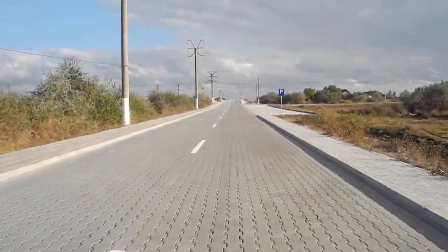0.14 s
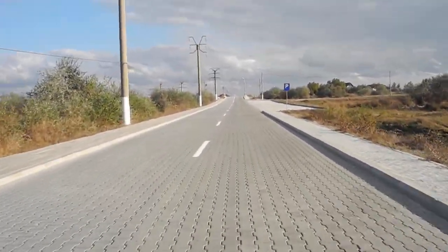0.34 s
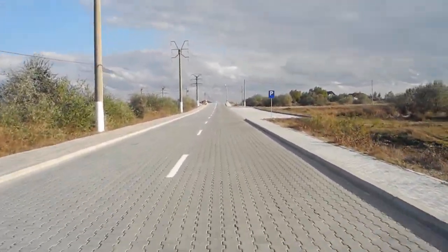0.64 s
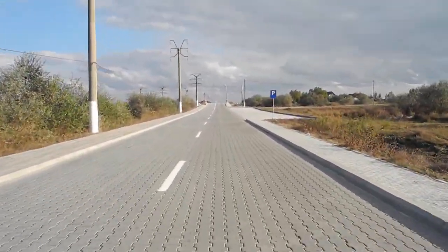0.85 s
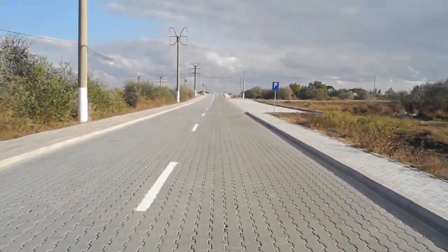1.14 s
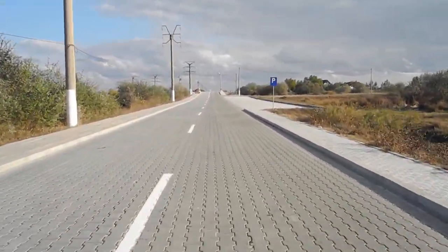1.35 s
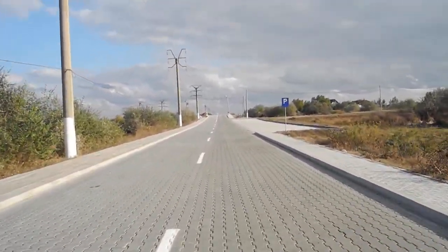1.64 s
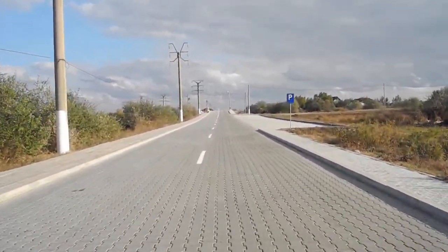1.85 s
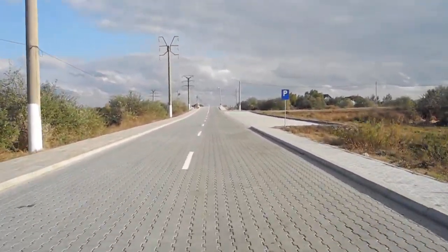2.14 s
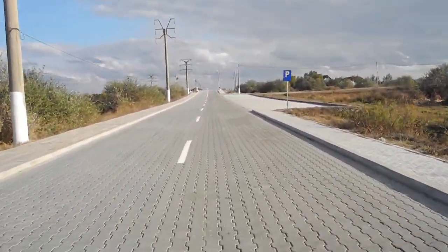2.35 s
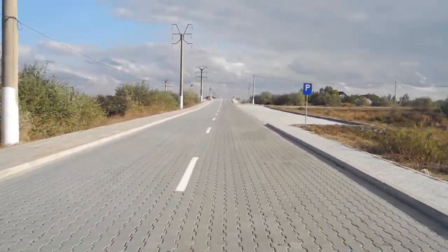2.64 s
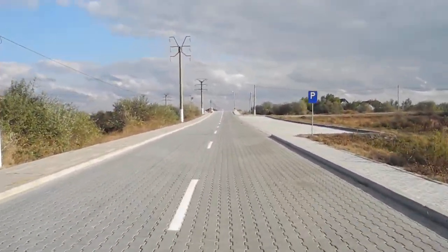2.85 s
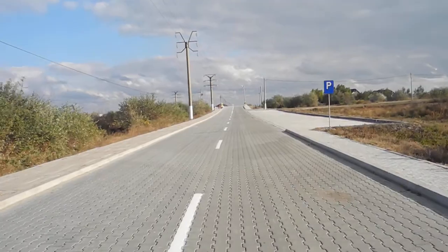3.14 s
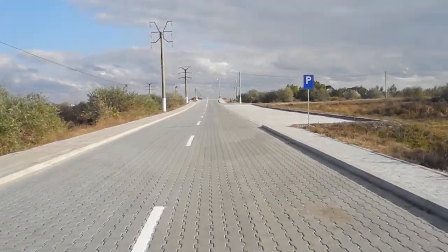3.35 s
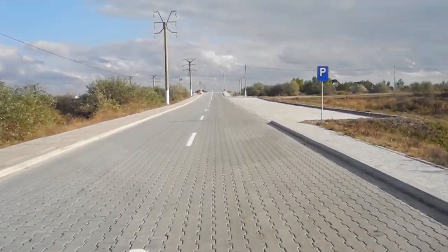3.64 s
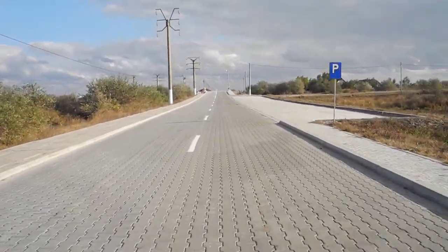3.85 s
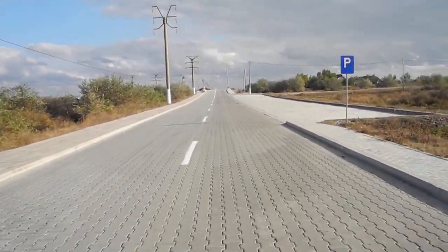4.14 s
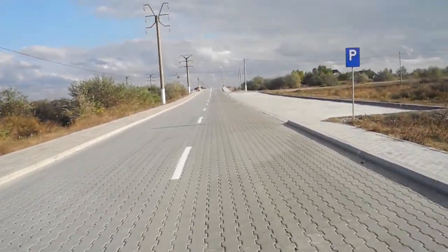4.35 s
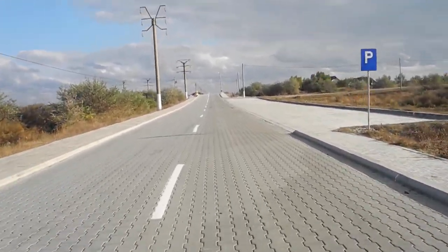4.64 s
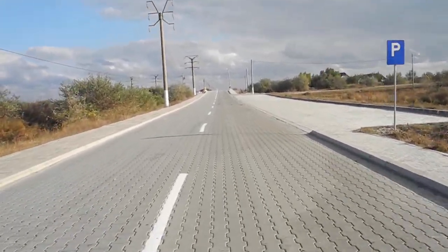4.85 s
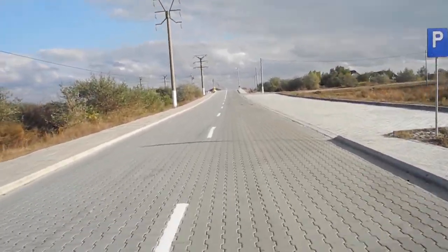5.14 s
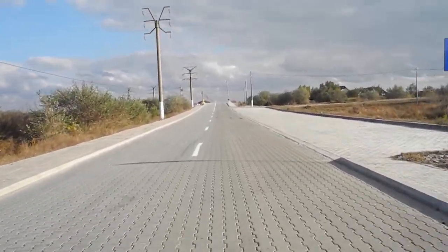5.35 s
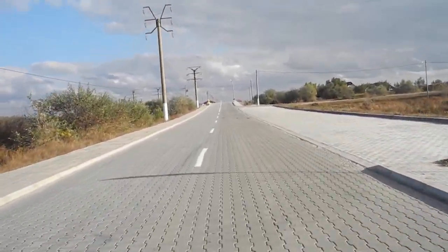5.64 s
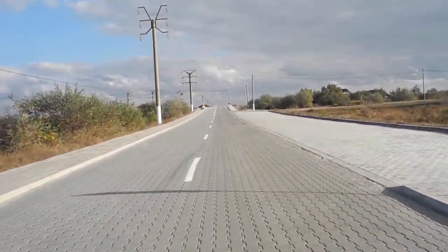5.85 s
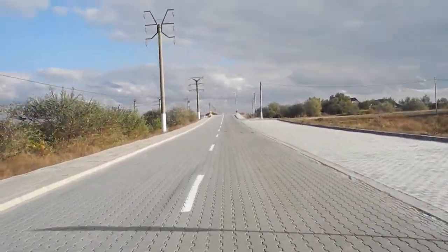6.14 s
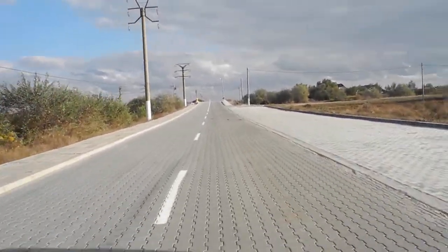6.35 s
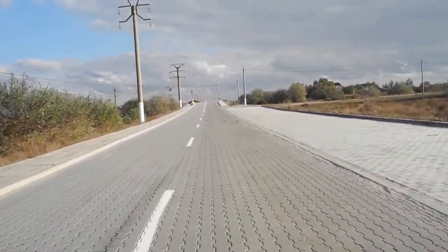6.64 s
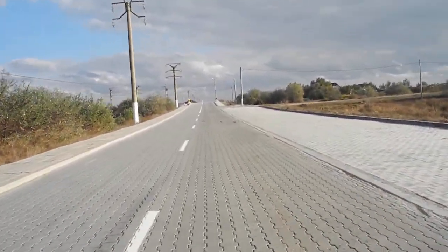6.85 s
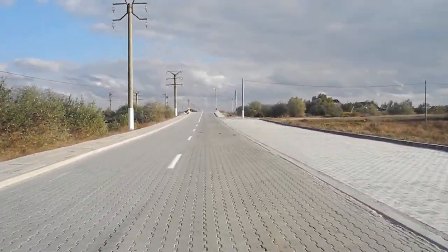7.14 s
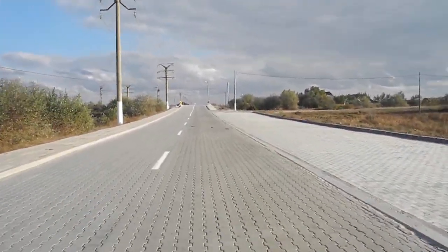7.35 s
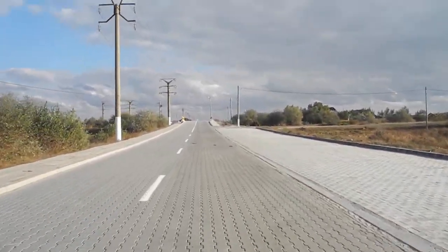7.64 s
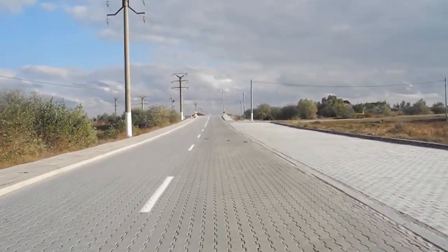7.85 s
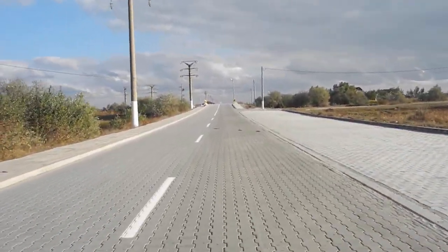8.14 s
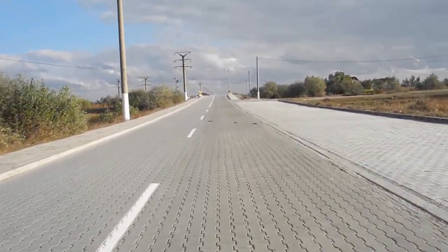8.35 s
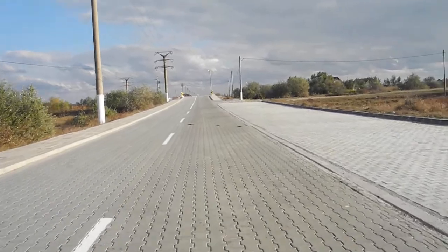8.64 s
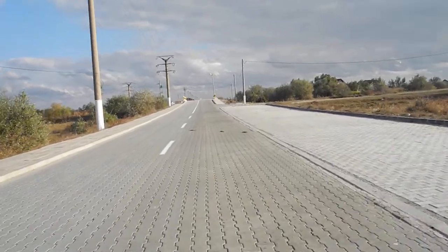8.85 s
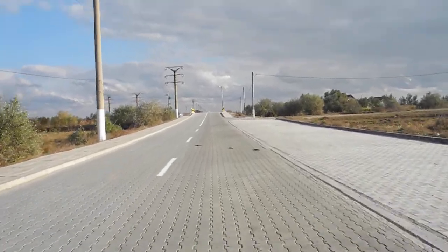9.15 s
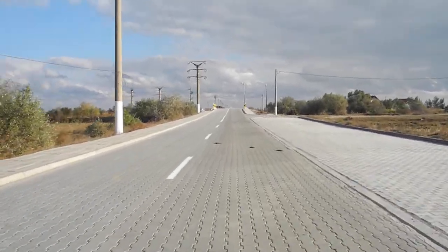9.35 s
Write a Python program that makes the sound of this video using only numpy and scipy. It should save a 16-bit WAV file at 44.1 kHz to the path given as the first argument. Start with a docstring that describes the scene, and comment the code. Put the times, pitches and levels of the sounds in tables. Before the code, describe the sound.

Wind buffets a microphone riding on a bicycle outdoors, a deep, uneven rumble with rushing air, hiss and crackle. Underneath, the tyres rumble steadily over paving stones, and loose parts give small, high rattles and clinks. Gusts and rattles come thickly in the first four seconds, thin out briefly, then return. Sharp pops, a few knock-like slaps of air and brief hollow hoots hit the microphone along the way.

```python
"""Cycling into the wind

A camera rides on a bicycle. The tyres rumble over paving stones and loose parts rattle and clink.
Air buffets the microphone ports, rushes over the case and hoots in single eddies; the ports hiss,
crackle and now and then take a slap. Gusts, shoves and brief lulls ride on a slowly changing headwind."""
import sys
import numpy as np
from scipy import signal
from scipy.fft import rfft, irfft
from scipy.io import wavfile
from scipy.ndimage import uniform_filter1d, map_coordinates

SR = 44100
rng = np.random.default_rng(int(sys.argv[2]) if len(sys.argv) > 2 else 0)


def put_to_file(sound):
    """Save the sound as 16-bit audio at rate SR, in the file named by the first command-line argument."""
    columns = np.atleast_2d(sound).T  # one column per channel
    safe = np.clip(columns, -1, 1)
    whole_steps = np.round(safe * 32767)
    wavfile.write(sys.argv[1], SR, whole_steps.astype(np.int16))


N = 418509
TIME = np.arange(N) / SR
USUAL_HISS_DB = -70.5


def undb(db):
    """Decibels to gain."""
    return 10 ** (np.asarray(db) / 20)


def unit(x):
    """Scale to rms 1."""
    return x / np.sqrt(np.mean(x ** 2))


def wander(rate_hz):
    """Smooth random wander of rms 1."""
    steps = rng.standard_normal(N // 20)
    return unit(map_coordinates(steps, [TIME * rate_hz], order=2, mode="mirror"))


def colour(x, outline, size=4096):
    """Minimum-phase filter of unit energy, shaped by (Hz, dB) points."""
    hz, db = np.transpose(outline)
    bin_hz = np.maximum(np.arange(size // 2 + 1) * SR / size, 1)
    gain = undb(np.interp(np.log(bin_hz), np.log(hz), db))
    cepstrum = irfft(np.log(gain))
    cepstrum[1:size // 2] *= 2
    cepstrum[size // 2 + 1:] = 0
    response = irfft(np.exp(rfft(cepstrum)))
    return signal.oaconvolve(np.atleast_2d(x), [response / np.linalg.norm(response)], axes=1)[:, :N]


def zero_phase(x, order, hz, kind="low"):
    """Flat-passband filter, run forwards and backwards."""
    return signal.sosfiltfilt(signal.butter(order, hz, kind, fs=SR, output="sos"), x)


def resonate(x, hz, *widths_hz):
    """Resonances in series, one per width, with gain 1 at the centre."""
    for width_hz in widths_hz:
        x = signal.lfilter(*signal.iirpeak(hz, hz / width_hz, fs=SR), x)
    return x


def add(out, start_s, sound):
    """Mix a short sound in."""
    start = max(int(start_s * SR), 0)
    part = sound[..., :N - start]
    out[..., start:start + part.shape[-1]] += part


def specks(per_s, spread_db):
    """Sparse impulses, independent left and right; most are small, a few large."""
    hit = rng.random((2, N)) < per_s / SR
    sign = rng.choice([-1, 1], (2, N))
    return hit * sign * undb(spread_db * (rng.random((2, N)) ** 2 - 3.0))


def swells(rows):
    """Bell curves summed in dB. Each row: centre in seconds, half-height width in seconds, height in dB."""
    t = TIME[::100]
    bells = sum(db * .5 ** ((2 * (t - centre_s) / width_s) ** 2) for centre_s, width_s, db in rows)
    return np.interp(TIME, t, bells)


# Each row: resonance in Hz, width in Hz, gain in dB.
PART_MODES = [(4294, 75, 8.5), (4560, 290, 5), (5620, 580, -0.5), (6220, 410, 2.5)]


def loose_parts(knock, detune=1):
    """The bike's loose parts answer a knock with short, high resonances."""
    return sum(undb(db) * resonate(knock, hz * detune, width_hz) for hz, width_hz, db in PART_MODES)


# Each row: frequency in Hz, relative level in dB.
TYRE_SPECTRUM = [(40, -8.5), (120, 6), (270, 0.5), (330, 2), (520, -15.5), (820, -2), (1050, -21),
                 (1700, -23.5), (2300, -40.5), (6500, -50), (15000, -84)]


def tyres(hiss_db, roll_db=-47, joint_hz=37, bump_depth=0.84, decay_cycles=0.082, jiggle_gain_db=56):
    """The tread bumps at every paving joint; loose parts jiggle more when the ride is rough and windy."""
    joint_phase = np.cumsum(joint_hz * (1 + 0.05 * wander(8.7))) / SR % 1
    load = unit(1 + bump_depth * undb(8.4 * wander(40)) * np.exp(-joint_phase / decay_cycles))
    roll = colour(rng.standard_normal(N) * load, TYRE_SPECTRUM)
    shake_db = np.minimum(hiss_db, np.median(hiss_db) + 13)
    jiggles_per_s = 16 * load ** 2 * undb(0.52 * (shake_db - USUAL_HISS_DB))
    jiggle = loose_parts(specks(jiggles_per_s, spread_db=10))
    return roll * undb(roll_db) + jiggle * undb(jiggle_gain_db + shake_db)


# Each row: time in seconds, level before trim in dB, tick relative to ring in dB.
RATTLE_HITS = [(0.283, -51.5, -20), (0.709, -49, -18), (0.923, -52, -22), (1.256, -48, -18),
               (1.313, -41, -10), (1.455, -49, -17), (1.585, -40, 4.5), (1.68, -52, -20), (2.071, -50, -12),
               (2.144, -52, -16), (2.674, -42, -16), (2.772, -52, -15), (2.953, -47.5, -4),
               (3.052, -51, -7), (3.216, -50.5, -13), (3.397, -46, -20), (3.446, -44, -7), (3.599, -45, -4),
               (3.764, -46, -6), (4.019, -45, -7), (6.182, -54.5, -16), (6.474, -49, -17), (6.565, -52, -6),
               (6.661, -47, -7), (6.802, -57, -11), (7.029, -55, -3), (7.279, -51, 1), (7.834, -45.5, -8),
               (8.015, -46, -20.5), (8.124, -46.5, -20.5), (8.212, -55.5, -26), (8.672, -46.5, -21),
               (9.046, -46, -21), (9.17, -46.5, -28)]


def rattles(rise_s=0.00041, decay_s=0.0009, touches=4, chatter_db=-11, chatter_s=0.0095,
            tick_hz=10500, tick_width_hz=4500, trim_db=-14, size=4096):
    """A brief knock amid a cluster of lighter touches; harder contact adds a bright tick."""
    out, t = np.zeros((2, N)), (np.arange(size) - size // 2) / SR

    def touch(lag_s):
        return np.exp(np.minimum((t - lag_s) / rise_s, (lag_s - t) / decay_s))

    for time_s, db, tick_db in RATTLE_HITS:
        chatter = sum(rng.random() * touch(lag_s) for lag_s in chatter_s * rng.standard_normal(touches))
        knock = rng.standard_normal((2, size)) * (touch(0) + undb(chatter_db) * chatter)
        tick = unit(resonate(knock, tick_hz, tick_width_hz, 2 * tick_width_hz))
        detune = np.exp(0.04 * rng.standard_normal())  # each contact holds the parts differently
        ring = unit(loose_parts(knock, detune))
        add(out, time_s + t[0], unit(ring + undb(tick_db) * tick) * undb(db + trim_db))
    return out


# Each row: start in seconds, level before trim in dB, pitch in Hz.
SHORT_NOTES = [(2.206, -42, 1700), (2.673, -54, 4040), (3.445, -55, 2080), (3.569, -44, 2300),
               (6.581, -55, 1930), (6.658, -50.5, 2300), (6.694, -52, 1880), (6.768, -51, 1900),
               (7.277, -47.5, 1940), (7.589, -51, 2720)]


def short_notes(rise_s=0.00031, decay_s=0.013, width_hz=420, trim_db=-6, size=2048):
    """Short pitched notes: clinks, and the midrange ring of two wind pops (2.206 s and 7.589 s)."""
    out, t = np.zeros(N), np.arange(size) / SR
    for start_s, db, hz in SHORT_NOTES:
        burst = rng.standard_normal(size) * (1 - np.exp(-t / rise_s)) * np.exp(-t / decay_s)
        note = unit(resonate(burst, hz, width_hz, width_hz))
        add(out, start_s, note * undb(db + trim_db))
    return out


# Each row: time in seconds, wind strength in dB.
HEADWIND = [(0, -60.5), (0.6, -55), (1.2, -50.5), (1.85, -50.5), (2.55, -52), (3.11, -50), (3.3, -55),
            (3.88, -51.5), (4.2, -57.5), (4.7, -55), (5.81, -50), (6.51, -55.5), (7.15, -57.5),
            (8.07, -54.5), (8.47, -55), (8.65, -46), (8.95, -48.5), (9.3, -46.5), (9.49, -60)]
# Each row: centre in seconds, width in seconds, rush rise in dB, hiss rise in dB.
WIND_GUSTS = [(0.32, 0.2, 3, 2.5), (0.711, 0.037, 6.5, 11), (1.05, 0.35, 1.5, 2), (1.26, 0.032, 7, 7),
              (1.314, 0.045, 12, 17), (1.58, 0.16, 6, 6.5), (2.209, 0.1, 5, 8.5), (2.59, 0.16, 6.5, 5),
              (2.642, 0.041, 6.5, 12), (2.77, 0.14, 5, 8.5), (3.055, 0.075, 7.5, 5), (3.56, 0.13, 6.5, 11),
              (3.78, 0.12, 9, 10), (5.535, 0.073, 8, 1), (6.66, 0.22, 3, 7.5), (6.77, 0.072, 7, 7.5),
              (7.28, 0.023, 8, 14), (7.62, 0.084, 5.5, 4), (7.819, 0.058, 8.5, 9), (8.7, 0.038, 5.5, 0.5),
              (8.84, 0.04, 8, 7), (9.06, 0.087, 3, 3), (9.326, 0.051, 6, 4)]
# Each row: centre in seconds, width in seconds, buffet change in dB, rush change in dB (capped at 0).
WIND_LULLS = [(0.2, 0.043, -18, -4.5), (0.552, 0.054, -11.5, -5), (0.859, 0.072, -5, -0.5),
              (1.46, 0.053, -12.5, -2.5), (1.68, 0.032, -11, 0), (2.41, 0.03, -5, -11),
              (2.47, 0.068, -18, 9), (2.87, 0.061, -3, -5.5), (3.45, 0.12, -5.5, -2),
              (3.72, 0.1, -8.5, -1.5), (4.242, 0.041, -4, -10), (4.329, 0.033, -11, -5),
              (4.729, 0.089, -4.5, -4), (5.38, 0.12, -5, -4), (5.77, 0.03, -16, 0),
              (6.405, 0.043, -13, -14), (6.669, 0.079, -10, 0.5), (7.21, 0.066, -6.5, -3.5),
              (7.47, 0.08, -12, -4), (8.259, 0.04, -14, -6), (8.55, 0.14, -11, -3), (9.249, 0.15, -6, 0)]
# Each row: centre in seconds, width in seconds, buffet rise in dB.
WIND_SHOVES = [(0.46, 0.073, 4.5), (0.97, 0.027, 4), (1.61, 0.04, 6.5), (1.85, 0.068, 4), (2.2, 0.025, 3.5),
               (2.64, 0.05, 4), (2.815, 0.035, 6), (5.17, 0.027, 5.5), (5.62, 0.0605, 6.5),
               (5.82, 0.041, 9.5), (6.5, 0.045, 7.5), (7.27, 0.04, 4.5), (8.16, 0.058, 5)]


def airflow(usual_wind_db=-53, usual_buffet_db=-33.5, unrest_hz=14, unrest_db=1.19, sputter_db=1.76):
    """Drive levels in dB: headwind and gusts lift rush and hiss, shoves lift the buffet, lulls dip them."""
    wind = np.interp(TIME, *np.transpose(HEADWIND)) - usual_wind_db
    unrest = unrest_db * wander(unrest_hz)
    sputter = sputter_db * wander(unrest_hz)
    rush_gust = swells((s, width_s, db) for s, width_s, db, _ in WIND_GUSTS)
    hiss_gust = swells((s, width_s, db) for s, width_s, _, db in WIND_GUSTS)
    buffet_lull = swells((s, width_s, db) for s, width_s, db, _ in WIND_LULLS)
    rush_lull = swells((s, width_s, min(db, 0)) for s, width_s, _, db in WIND_LULLS)
    buffet_db = usual_buffet_db + swells(WIND_SHOVES) + buffet_lull
    rush_db = usual_wind_db + wind + unrest + rush_gust + rush_lull
    hiss_db = USUAL_HISS_DB + 0.98 * wind + unrest + hiss_gust + 1.43 * rush_lull + sputter
    return buffet_db, rush_db, hiss_db


# Each row: frequency in Hz, relative level in dB.
HISS_SPECTRUM = [(1500, -33), (3000, 3.5), (3600, -3.5), (4200, 0), (5200, -1), (6500, -1), (8000, -5.5),
                 (11000, -10.5), (16000, -17)]


def hissing(hiss_db, air_gain_db=1.1, flicker_db=3, crackle_gain_db=43, clump_db=6, sheen_hz=8000):
    """Fine turbulence hisses and crackles in clumps at each port; slack air is duller and crackles less."""
    excess_db = hiss_db - USUAL_HISS_DB
    air = rng.standard_normal((2, N)) * undb(air_gain_db + flicker_db * wander(64))
    crackles_per_s = 60 * undb(excess_db + clump_db * wander(30))
    crackle = specks(crackles_per_s, spread_db=12.5) * undb(crackle_gain_db)
    hiss = colour((air + crackle) * undb(hiss_db), HISS_SPECTRUM)
    dull = zero_phase(hiss, 3, sheen_hz)
    sheen_db = np.minimum(1.4 * excess_db - 3.5, 1)
    return dull + (hiss - dull) * undb(sheen_db)


# Each row: frequency in Hz, relative level in dB.
POP_SPECTRUM = [(500, 5), (2500, -8), (3300, 0.5), (4300, 1.5), (6500, 0.5), (9000, -4), (13000, -9),
                (16000, -19)]
# Each row: time in seconds, level before trim and filter in dB, port (0 left, 1 right).
LOUD_POPS = [(0.06, -25.5, 0), (1.352, -28, 1), (1.725, -35, 1), (1.804, -30, 1), (1.831, -28, 1),
             (2.253, -25.5, 1), (2.272, -28, 1), (2.295, -26, 1), (3.925, -29.5, 0), (4.208, -26.5, 0),
             (4.401, -28.5, 0), (4.466, -27.5, 0), (4.895, -29, 1), (4.932, -27, 1), (5.174, -26.5, 0),
             (5.562, -27, 1), (5.651, -29.5, 1), (5.822, -27, 0), (6.126, -27.5, 1), (6.159, -28, 1),
             (6.323, -33, 1), (6.344, -30, 1), (6.745, -24, 1), (6.831, -30, 1), (6.963, -34.5, 1),
             (7.006, -29.5, 1), (7.408, -27.5, 1), (7.591, -24.5, 1), (7.682, -26, 1), (8.17, -31.5, 1),
             (8.721, -32.5, 0), (9.43, -29.5, 0)]


def pops(buffet, hiss_db, crest_over_rms=1.8, over_hiss_db=31, scatter_db=5.5, trim_db=3,
         soften_db=-30, soften_s=0.0044, size=1024):
    """Air pops at one port; a brief noise swell softens each pop's edges. Small pops ride buffet crests."""
    crests, _ = signal.find_peaks(np.abs(unit(buffet[0])), height=crest_over_rms, distance=size // 2)
    small_db = over_hiss_db + np.minimum(hiss_db, np.median(hiss_db))  # fades in the lulls
    small_pops = [(i / SR, small_db[i] + scatter_db * rng.standard_normal(), rng.random())
                  for i in crests]
    out, t = np.zeros((2, N)), (np.arange(size) - size // 2) / SR
    for time_s, db, port in list(LOUD_POPS) + small_pops:
        impulse = t == 0
        soft_edge = undb(soften_db) * rng.standard_normal(size) * np.exp(-np.abs(t) / soften_s)
        add(out[int(port > .5)], time_s + t[0], (impulse + soft_edge) * undb(db + trim_db))
    return colour(out, POP_SPECTRUM)


# Each row: time in seconds, level in dB.
AIR_SLAPS = [(2.186, -24), (2.208, -17), (5.824, -22), (6.127, -21.5), (6.158, -26), (7.368, -26),
             (7.591, -21), (7.81, -24)]


def slaps(edge_s=0.00014, settle_s=0.0023, size=1024):
    """Air pressure sags, jumps up and settles within milliseconds, sounding like a knock."""
    out, t = np.zeros(N), (np.arange(size) - size // 2) / SR
    jump = np.tanh(t / edge_s) * np.exp(-np.abs(t) / settle_s)
    for time_s, db in AIR_SLAPS:
        add(out, time_s + t[0], jump * undb(db))
    return out


# Each row: centre in seconds, level in dB, length in seconds, pitch in Hz, spit relative to hoot in dB.
PORT_EDDIES = [(0.315, -24.5, 0.0031, 430, -21), (0.679, -22, 0.019, 384, -20),
               (1.807, -25, 0.0062, 355, -29), (1.99, -23.5, 0.0068, 346, -29),
               (2.074, -22.5, 0.013, 400, -23), (2.214, -24.5, 0.012, 413, -14.5),
               (2.365, -28, 0.012, 372, -37), (2.953, -25.5, 0.018, 363, -18),
               (4.801, -22, 0.014, 390, -37), (4.834, -24.5, 0.01, 380, -36.5),
               (5.063, -31.5, 0.028, 407, -17), (5.153, -28, 0.0099, 392, -13),
               (5.309, -19.5, 0.0071, 413, -24), (5.323, -26.5, 0.008, 597, -8),
               (5.724, -23.5, 0.0053, 410, -31), (5.815, -22, 0.012, 394, -27),
               (5.865, -27, 0.014, 380, -23), (6.109, -33.5, 0.014, 544, -1), (6.125, -26, 0.013, 402, -25),
               (6.241, -25, 0.015, 392, -22), (6.296, -32, 0.019, 403, -39), (6.682, -30, 0.0064, 370, -18),
               (6.871, -28, 0.014, 373, -33), (7.341, -25.5, 0.0075, 398, -32),
               (7.367, -19, 0.0059, 383, -29), (7.588, -22, 0.0027, 390, -17),
               (7.839, -24, 0.0071, 343, -20), (7.948, -24.5, 0.026, 410, -19),
               (8.042, -23.5, 0.012, 386, -29), (8.313, -31.5, 0.032, 348, -32),
               (8.715, -19.5, 0.01, 354, -31), (8.788, -30, 0.014, 332, -23), (8.843, -32, 0.022, 344, -10)]


def eddies(hoot_width_hz=170, spit_hz=730, spit_width_hz=420, band_hz=(240, 1300), size=6144):
    """Each eddy swells and dies across the ports with a rough, hollow hoot under a breathy spit."""
    out, t = np.zeros(N), (np.arange(size) - size // 2) / SR
    for centre_s, db, length_s, hz, spit_db in PORT_EDDIES:
        air = rng.standard_normal((2, size))
        swell = np.hanning(size) / np.sqrt(1 + (2 * t / length_s) ** 2)
        hoot = resonate(air[0], hz, hoot_width_hz, hoot_width_hz)
        strength = np.sqrt(uniform_filter1d(hoot ** 2, size=400) + 1e-12)
        hoot = unit(hoot / strength)  # steady strength, wavering pitch
        spit = unit(resonate(air[1], spit_hz, spit_width_hz, spit_width_hz))
        add(out, centre_s + t[0], (hoot + undb(spit_db) * spit) * swell * undb(db))
    return zero_phase(out, 3, band_hz, "band")


# Each row: frequency in Hz, relative level in dB.
RUSH_SPECTRUM = [(150, -22.5), (290, -10), (324, 5.5), (360, -0.5), (405, -3), (470, -2.5), (540, -8.5),
                 (690, -10.5), (820, -12), (940, -17), (1120, -19.5), (1310, -15), (1520, -23),
                 (1780, -21.5), (1950, -28.5), (3100, -39.5), (5000, -70)]


def rushing(rush_db, flutter_db=2, throb_db=2, split_hz=850, body_gain_db=11, edge_gain_db=12):
    """Turbulence sounds the hollows of the case; faster air is brighter."""
    air = colour(rng.standard_normal(N) * undb(flutter_db * wander(110)), RUSH_SPECTRUM)
    body = zero_phase(air, 2, split_hz)
    edge = air - body
    mean_db = np.mean(rush_db)
    body_db = body_gain_db + mean_db + 0.87 * (rush_db - mean_db) + throb_db * wander(35)
    return body * undb(body_db) + edge * undb(rush_db + edge_gain_db)


# Each row: frequency in Hz, relative level in dB.
BUFFET_SPECTRUM = [(15, -17), (30, -6), (55, -3), (90, -2), (135, 0), (190, -5), (260, -12), (400, -32),
                   (900, -68)]


def buffeting(buffet_db, shed_hz=22, swing_hz=90, swing_db=-2, levelling=0.72, flutter_db=2.5):
    """Vortices peel off the camera in a loose rhythm, each swinging the pressure amid turbulent rumble."""
    shed_cycles = np.cumsum(shed_hz * np.exp(.3 * wander(22))) / SR
    swing_cycles = np.cumsum(swing_hz * np.exp(.27 * wander(45))) / SR
    swings = unit(np.sin(np.pi * shed_cycles) ** 2 * np.sin(2 * np.pi * swing_cycles))
    rumble = colour(rng.standard_normal(N), BUFFET_SPECTRUM)
    pressure = rumble + undb(swing_db) * swings
    # Partly levelled, so the average strength follows the shoves and lulls.
    strength = np.sqrt(uniform_filter1d(unit(pressure) ** 2, size=3000) + 1e-6)
    return unit(pressure / strength ** levelling) * undb(buffet_db + flutter_db * wander(16))


def scene():
    """Wind on the camera over the rolling bike."""
    buffet_db, rush_db, hiss_db = airflow()
    bike = tyres(hiss_db) + rattles()
    notes = short_notes()
    buffet = buffeting(buffet_db)
    wind = buffet + rushing(rush_db) + eddies() + hissing(hiss_db) + pops(buffet, hiss_db) + slaps()
    return bike + notes + wind


def record(dry, mono_below_hz=3090, top_hz=16000):
    """The camera merges its two ports below the treble and cuts the top."""
    mid, side = (dry[0] + dry[1]) / 2, (dry[0] - dry[1]) / 2
    side = zero_phase(side, 6, mono_below_hz, "high")
    top_cut = signal.ellip(10, .2, 70, top_hz, fs=SR, output="sos")
    return signal.sosfilt(top_cut, [mid + side, mid - side])


dry = scene()
out = record(dry)
put_to_file(out)
```